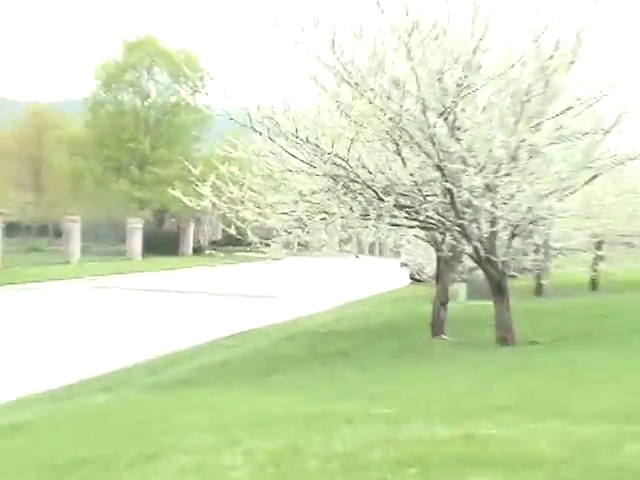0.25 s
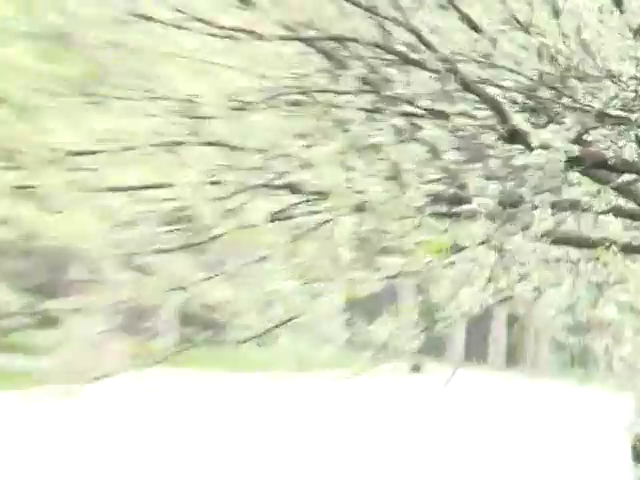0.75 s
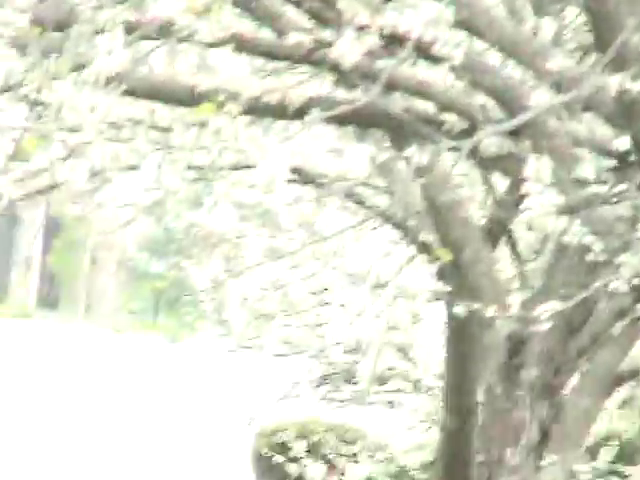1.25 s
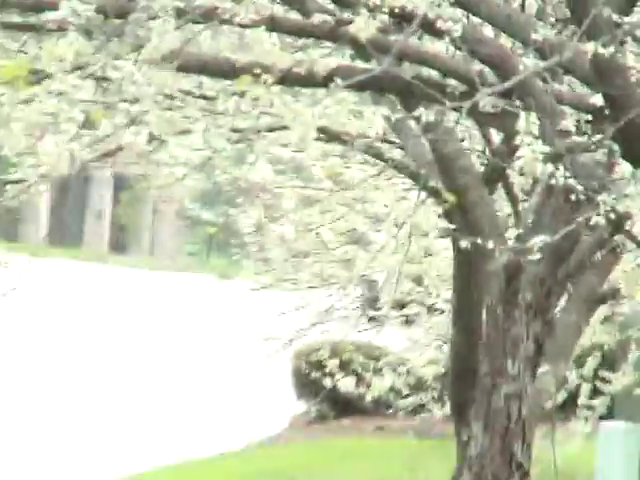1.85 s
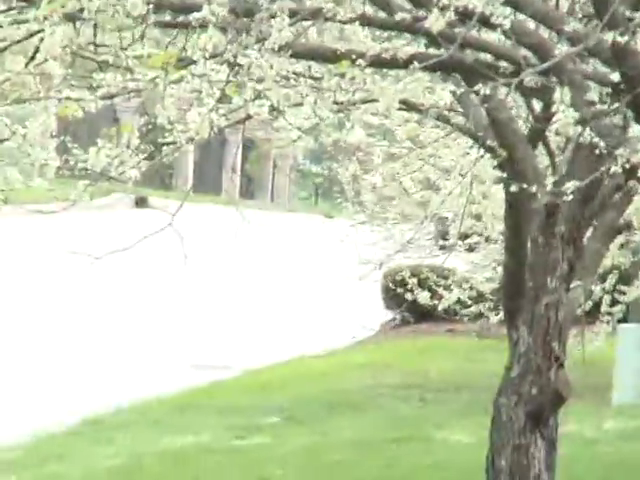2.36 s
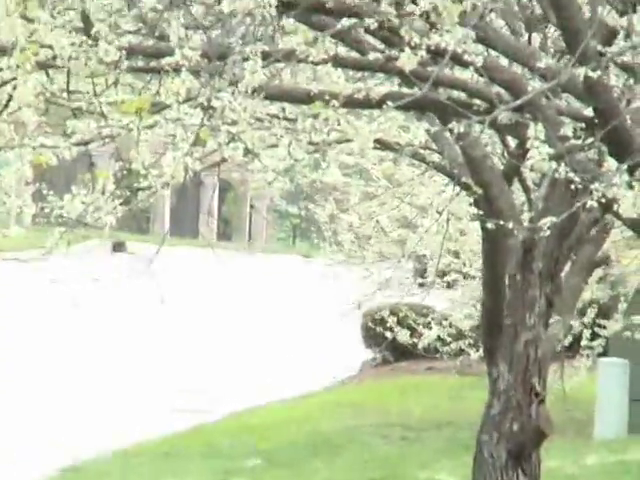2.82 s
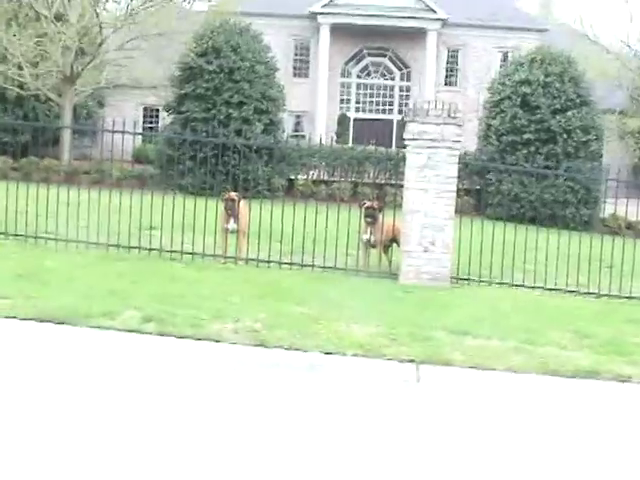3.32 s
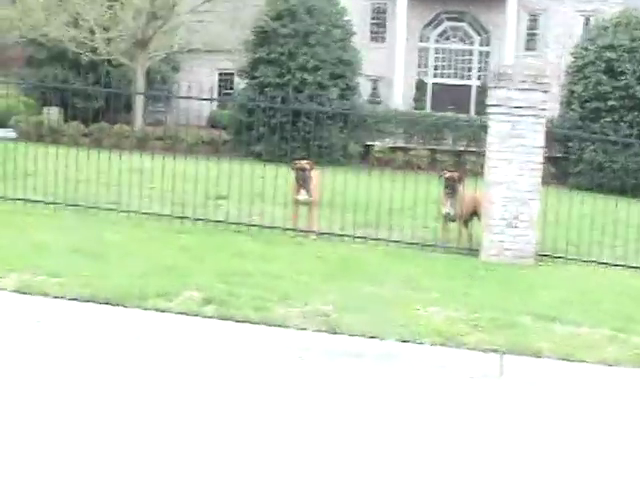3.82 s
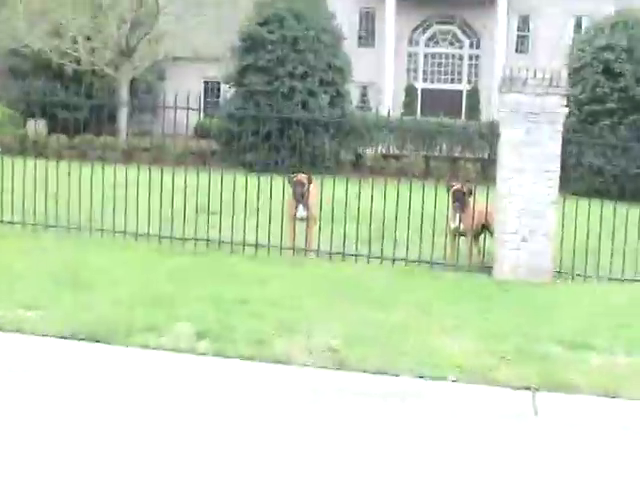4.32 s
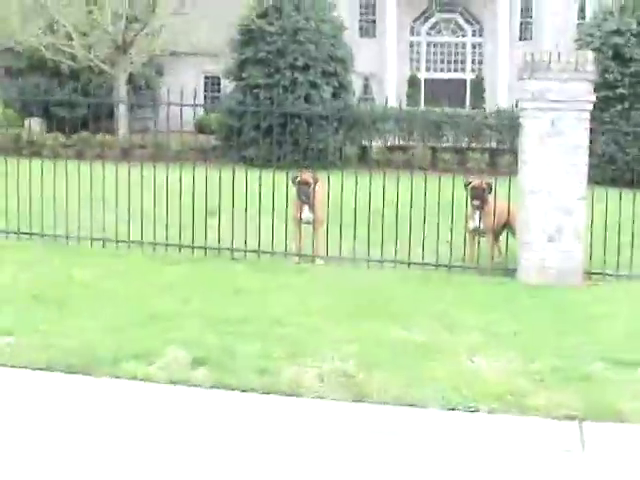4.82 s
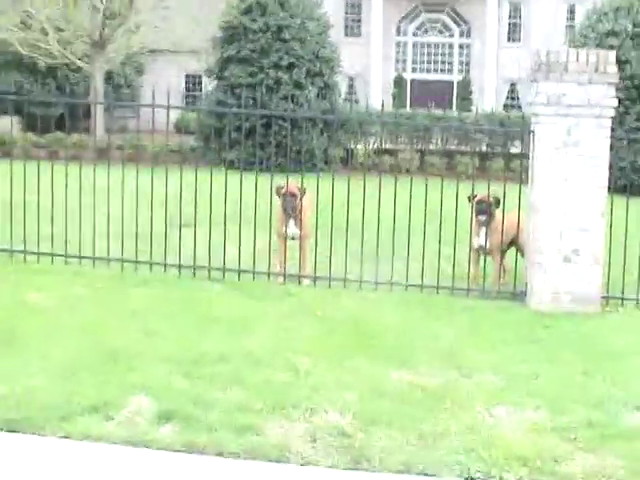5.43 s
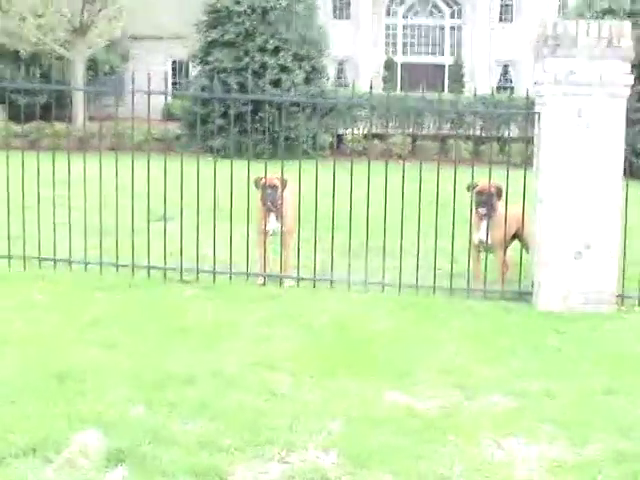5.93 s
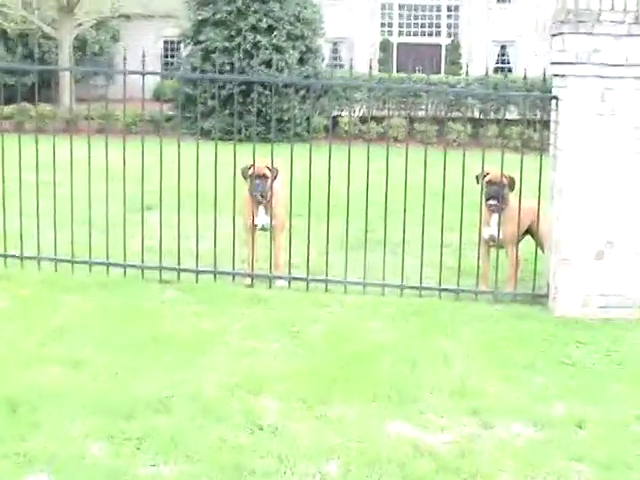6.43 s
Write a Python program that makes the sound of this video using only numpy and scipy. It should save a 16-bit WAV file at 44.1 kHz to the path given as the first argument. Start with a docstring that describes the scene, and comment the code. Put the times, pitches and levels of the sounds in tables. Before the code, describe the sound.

Hollow tyre howl and hiss recede within a second and a half, clicks and chirps follow, then a sudden switch to rapid birdsong, wind puffs and grass shuffles.

```python
"""An electric cart rolls away on a paved drive: noise through groove resonances howls over hiss and rumble.
Under it lie air, a distant drone, a whine and a hum; slurred bird whistles and small hard clicks follow.
Just after 3 s the scene cuts abruptly: drone and whine stop, fuller air begins, and a bird sings two runs
of arched notes, gliding sines echoed by a house front. Wind puffs and grass shuffles are swelling noise;
knocks ring briefly. Throughout, a converter clocked at 16 kHz mirrors the sound into the treble."""
import sys
import numpy as np
from scipy import signal
from scipy.fft import rfft, irfft, next_fast_len
from scipy.io import wavfile
from scipy.ndimage import uniform_filter1d, map_coordinates

SR = 44100
rng = np.random.default_rng(int(sys.argv[2]) if len(sys.argv) > 2 else 0)


def store_wav(level_fs):
    """Save 16-bit WAV to argv[1]."""
    pcm = np.round(np.clip(np.atleast_2d(level_fs), -1, 1) * 32767)
    wavfile.write(sys.argv[1], SR, pcm.T.astype(np.int16))


N = 294235

# Tread groove resonances, lowest, second and upper group: (centre [Hz], width [Hz], relative level [dB])
LOW_GROOVES = [(695, 44, 1), (804, 32, 7.5), (905, 340, -16)]
SECOND_GROOVES = [(1527, 17, -3), (1623, 43, 1), (1750, 136, -6.5), (1880, 80, -30)]
UPPER_GROOVES = [(2115, 230, -6.5), (2444, 120, 1.5), (2540, 64, -1), (2630, 64, -2), (2640, 98, 0)]
# Loudness of each groove group as the cart rolls off: (time [s], level [dB])
LOW_HOWL_LEVEL = [(0.0, -15.5), (0.036, -9.5), (0.132, -15), (0.326, -9.5), (0.42, -13.5), (0.434, -8.5),
                  (0.482, -17.5), (0.53, -12), (0.638, -18), (0.718, -11.5), (0.818, -18), (1.406, -41.5),
                  (1.486, -50.5), (1.7, -50.5)]
SECOND_HOWL_LEVEL = [(0.0, -14.5), (0.236, -17.5), (0.274, -11.5), (0.42, -22.5), (0.43, -17), (0.6, -14),
                     (0.624, -19.5), (0.638, -15.5), (0.89, -31.5), (1.7, -63)]
UPPER_HOWL_LEVEL = [(0.0, -15), (0.008, -14.5), (0.278, -21.5), (0.292, -17), (0.4, -22.5), (0.572, -17.5),
                    (0.618, -30), (0.634, -22.5), (1.5, -63.5)]
# Loudness of the tread hiss, before HISS_DB is added: (time [s], level [dB])
TREAD_HISS_LEVEL = [(0.0, -23.5), (0.066, -21.5), (0.354, -28), (0.568, -25.5), (0.648, -29.5),
                    (0.672, -25), (0.728, -32.5), (1.032, -44), (1.15, -45.5), (1.7, -71.5)]
# Noise colours of tread hiss and body rumble: (frequency [Hz], relative level [dB])
HISS_COLOUR = [(500, -11.5), (1250, -11.5), (3000, -2.5), (3350, 0.5), (3560, 4.5), (3750, -1.5),
               (4200, -2), (4800, -6), (5600, -6), (6700, -10.5), (8000, -21.5), (10000, -53)]
RUMBLE_COLOUR = [(25, -28), (60, -4.5), (120, -0.5), (240, -6.5), (400, -9), (600, -12), (1200, -31.5)]
# Left-right likeness of the tyre noise: (frequency [Hz], likeness [0-1])
CART_ALIKE = [(200, 0.64), (700, 0.77), (1500, 1), (2500, 0.82), (4500, 0.72), (7000, 0.47)]
# Phase by which the left channel leads the right: (frequency [Hz], lead [rad])
CART_LEAD = [(0, 0), (520, 0.64), (2670, 0.36), (6290, 0.22), (7670, 0.39), (12400, -0.3), (13400, -0.19),
             (15200, -0.5)]
HISS_DB = 2.5  # tread hiss above its level table
BODY_DB, BODY_SAG_DB_PER_S = -36.5, 4  # body rumble and its slow decline
BODY_GONE_S, BODY_FADE_DB_PER_S = 1.19, 35  # from here the rumble drops away faster

# Noise colours of open air and distant drone: (frequency [Hz], relative level [dB])
AIR_COLOUR = [(25, -6), (60, -2), (115, 0), (170, -9), (280, -5.5), (420, -7.5), (650, -4.5), (1000, -9),
              (1700, -14), (2500, -5), (3600, -19), (5850, -16.5), (8000, -22), (10400, -32)]
DRONE_COLOUR = [(25, -20), (65, -2.5), (120, 1.5), (160, -10.5), (320, -2.5), (400, -8.5), (470, -14),
                (620, -10), (800, -10), (1000, -15), (1900, -15.5), (5000, -20), (7500, -21.5),
                (10400, -49)]
# Left-right likeness of rumble, air, drone and grass: (frequency [Hz], likeness [0-1])
OPEN_ALIKE = [(50, 0.18), (130, 0.28), (300, 0.75), (1400, 0.83), (3000, 0.64), (7000, 0.22)]
CUT_S, CUT_FADE_S = 3.06, 0.023  # centre and length of the abrupt cut
AIR_DB, AIR_BEFORE_DB = -49.5, -14  # air after the cut; how much lower it lies before
DRONE_DB, FLOOR_GRAIN_DB = -48.5, 0.7  # drone rms level; grain depth of air and drone
WHINE_DB, HUM_PEAK_DB = -63.5, -70  # settled whine, rms; hum, peak
WHINE_EXTRA_DB, WHINE_EASE_S, WHINE_SETTLED_S = 13.5, 1.05, 1.62  # stronger at first, eases, settles

# Other birds' whistles: (start [s], length [s], start, middle and end pitch [Hz], level [dB])
WHISTLES = [(1.153, 0.013, 6500, 7360, 8300, -32), (1.453, 0.025, 6360, 6320, 6600, -48.5),
            (1.979, 0.051, 4400, 3930, 3930, -61), (2.14, 0.18, 3790, 3790, 4640, -63),
            (2.362, 0.16, 3330, 3060, 2800, -59), (2.461, 0.035, 6700, 6550, 6260, -49.5),
            (2.468, 0.17, 2635, 2180, 1950, -50.5), (2.528, 0.043, 6500, 6600, 6550, -57.5),
            (2.561, 0.05, 4400, 4100, 3970, -55.5), (2.575, 0.2, 2080, 1836, 1730, -55.5),
            (2.751, 0.0094, 5960, 7150, 7950, -52), (2.812, .08, 6350, 5360, 4900, -54.5),
            (2.909, 0.096, 3500, 3070, 2810, -48), (3.67, 0.026, 4650, 4970, 5070, -49.5),
            (4.205, 0.019, 4650, 5030, 5200, -47.5), (5.779, 0.047, 7000, 6860, 6800, -49.5),
            (5.892, 0.037, 7330, 7530, 7540, -51)]
# Small hard clicks: (time [s], peak [dB])
CLICKS = [(1.301, -20), (1.602, -33), (1.84, -28.5), (2.124, -36)]
# Ringing modes of the clicking part: (frequency [Hz], relative level [dB], t60 [s])
CLICK_MODES = [(660, 2, 0.029), (1140, -4, 0.022), (1900, 3, 0.026), (2500, -28, 0.0183), (3830, -16, .015)]

# Arched notes before a run reshapes them: (time from crest [s], pitch [Hz], relative level [dB])
FIRST_NOTE = [(-.048, 2151, -25), (-.026, 2192, -10.5), (-.015, 2652, -10.5), (-.006, 3032, -11.5),
              (.004, 2979, -9), (.013, 2740, -1.5), (.022, 2470, -2.5), (.030, 2220, -8.5),
              (.035, 2000, -35)]
SECOND_NOTE = [(-.055, 1793, -16), (-.038, 1774, -10), (-.027, 2023, -1), (-.016, 2677, -12),
               (0, 2795, -13), (.012, 2720, -4), (.021, 2275, -1), (.029, 2073, -9), (.037, 2000, -20)]
# Notes of each run: (crest time [s], level added to the note shape [dB], pitch ratio, length ratio)
FIRST_RUN = [(3.075, -31, 1.047, 0.61), (3.219, -33.5, 1.02, 1.06), (3.413, -32, 1.03, 0.78),
             (3.6, -34, 0.99, 0.79), (3.785, -33.5, 0.97, 0.87), (3.958, -34, 1.035, 0.86),
             (4.102, -33, 1.034, 0.81), (4.253, -32.5, 1.03, 0.96), (4.421, -30.5, 1.02, 0.79),
             (4.588, -30.5, 1.01, 0.83), (4.779, -31.5, 1.01, 0.81), (4.964, -34, 1.01, 0.91),
             (5.147, -36, 0.94, 1.29)]
SECOND_RUN = [(5.279, -36, 0.99, 0.82), (5.393, -36.5, 0.97, 0.93), (5.503, -35.5, 1.01, 1),
              (5.622, -36, 1, 0.96), (5.746, -40.5, 1.01, 1.2), (5.893, -36, 0.95, 0.79),
              (6.019, -38, .94, 1), (6.147, -35.5, 0.93, 1.02), (6.285, -36.5, 0.96, 1.17),
              (6.424, -39, 0.99, 1.13)]
# House front echoes of each run: (delay [s], level [dB])
FIRST_RUN_ECHOES = [(.058, -9), (.108, -15.5)]
SECOND_RUN_ECHOES = [(.058, -16.5)]
# Ground and gatepost reflections: (delay [s], level [dB])
NEAR_REFLECTIONS = [(.0031, -18), (.0056, -11), (.0095, -14), (.021, -22.5)]
# Decay of the garden scatter: (frequency [Hz], t60 [s])
GARDEN_DECAY = [(200, 0.22), (2500, 0.59), (8000, 0.85)]

# Noise colour of wind on the microphone: (frequency [Hz], relative level [dB])
WIND_COLOUR = [(20, -12), (60, -2), (110, 1), (160, -1), (260, -8), (500, -14.5), (1200, -47)]
# Left-right likeness of the wind: (frequency [Hz], likeness [0-1])
WIND_ALIKE = [(60, 0.68), (380, 0.7), (2380, 1), (15000, 0.41)]
# Puffs of wind: (start [s], hold [s], level before the low-pass [dB], low-pass corner [Hz])
PUFFS = [(3.19, .02, -60, 600), (3.34, 0.018, -68, 600), (3.65, 0.016, -41, 400), (3.81, .16, -42.5, 505),
         (4.224, 0.23, -41.5, 500), (4.83, .16, -49.5, 500), (5.441, .02, -47.5, 200),
         (5.913, 0.022, -42.5, 150), (6.477, 0.044, -40, 100), (6.6, 0.028, -47.5, 102)]
PUFF_ATTACK_S, PUFF_RELEASE_S, DRAUGHT_DB = 0.021, 0.048, -60  # time constants; wind between puffs
# Noise colour of rustling grass: (frequency [Hz], relative level [dB])
GRASS_COLOUR = [(200, -2), (700, -0.5), (1700, 2), (3300, -5), (5000, -7), (6500, -7.5), (8000, -13),
                (10000, -22)]
# Shuffles in the grass: (start [s], hold [s], level [dB])
SHUFFLES = [(3.53, 0.018, -58), (3.6, 0.084, -55), (3.785, 0.013, -44.5), (3.93, 0.021, -49.5),
            (4.12, 0.03, -59), (4.21, 0.03, -49), (4.61, .04, -58), (4.75, 0.032, -48), (5.22, 0.11, -55),
            (5.84, 0.023, -44.5), (6.19, 0.048, -44), (6.31, .05, -47.5)]
SHUFFLE_ATTACK_S, SHUFFLE_RELEASE_S, STIR_DB = 0.011, 0.024, -57  # time constants; faint stirring
# Knocks of hand and foot: (time [s], peak [dB], resonance [Hz], t60 of the scrape [s])
KNOCKS = [(3.593, -22.5, 382, 0.016), (3.597, -22.5, 700, 0.022), (4.094, -36, 660, 0.059),
          (4.23, -32, 4500, 0.0069), (4.652, -34, 500, 0.055), (4.988, -37, 640, 0.028),
          (5.368, -27.5, 1040, 0.0097), (5.505, -33.5, 660, 0.095), (5.551, -38, 703, 0.013),
          (5.795, -34.5, 1100, 0.027), (5.879, -22.5, 800, 0.014), (5.88, -25.5, 2470, .008),
          (6.166, -24.5, 685, 0.15), (6.192, -27, 740, 0.075), (6.216, -28, 750, 0.061),
          (6.371, -33.5, 3600, 0.013)]

# Level of the converter's mirror image: (image frequency [Hz], level [dB])
MIRROR_LEVEL = [(8000, -11), (8800, -9), (9500, -11), (11000, -15), (12500, -16.5), (13500, -21.5),
                (14400, -24), (15200, -30.5)]
CLOCK_HZ, TOP_HZ = 16000, 15600  # converter clock; upper edge of the output


def amp(db):
    """Decibels to gain."""
    return 10 ** (np.asarray(db) / 20)


def unit(x):
    """Scale to rms 1."""
    return x / np.sqrt(np.mean(x ** 2) + 1e-20)


def along(points, hz):
    """Read (Hz, value) points on a log frequency axis."""
    f, v = np.transpose(points)
    return np.interp(np.log(hz + 1), np.log(f), v)


def shape(points):
    """Turn (Hz, dB) points into a frequency response."""
    return lambda f: amp(along(points, f))


def gains(rows):
    """One gain per sample from (s, dB) rows; it dies away after the last row."""
    s, db = np.transpose(rows)
    return amp(np.interp(np.arange(N) / SR, np.r_[s, s[-1] + 2], np.r_[db, -100]))


def wobble(rate, size=N):
    """A smooth random curve with rate knots a second."""
    knots = rng.standard_normal(int(size * rate / SR) + 4)
    return map_coordinates(knots, [np.arange(size) * rate / SR])


def filtered(x, response):
    """Shape the spectrum of x by a response, with zero padding for the ring-out."""
    size = x.shape[-1]
    padded = next_fast_len(size + SR // 4)
    spectrum = rfft(x, padded) * response(np.fft.rfftfreq(padded, 1 / SR))
    return irfft(spectrum, padded)[..., :size]


def resonance(f, hz, width):
    """Response of one damped mode."""
    return 1j * f * width / (hz * hz - f * f + 1j * f * width)


def rush(colour, alike, grain_db=0, grain_rate=200):
    """Coloured stereo noise of rms 1, clumped into grains; mid-side balance sets the likeness."""
    source = rng.standard_normal((2, N)) * amp(grain_db * wobble(grain_rate))

    def mid_side(f):
        angle = np.arccos(np.clip(along(alike, f), 0, .999)) / 2
        return colour(f) * np.array([np.cos(angle), np.sin(angle)])

    mid, side = filtered(source, mid_side)
    return unit(np.array([mid + side, mid - side]))


def patchy(x, depth_db):
    """Let the colour of a noise wander: patches of random gain in time and frequency."""
    z = signal.stft(x, nperseg=512)[2]
    field = rng.standard_normal(z.shape[1:])
    field = uniform_filter1d(field, size=5, axis=0)  # smooth across frequency
    field = uniform_filter1d(field, size=16, axis=1)  # smooth across time
    return unit(signal.istft(z * amp(depth_db * unit(field)), nperseg=512)[1][:, :N])


def pan(x, right_db):
    """Lean a sound to the right, or to the left if negative."""
    return x * amp([[-right_db / 2], [right_db / 2]])


def lead(x, points):
    """Let the left channel lead the right one in phase."""
    return filtered(x, lambda f: np.exp(.5j * np.outer([1, -1], along(points, f))))


def add(track, s, sound):
    """Mix a sound in at time s."""
    part = track[max(round(s * SR), 0):][:len(sound)]
    part += sound[:len(part)]


def swells(rows, attack, release):
    """Gain of events that rise, hold and die away exponentially; the strongest one wins."""
    t = np.arange(N) / SR
    events = []
    for s, hold, db in rows:
        rise = np.minimum(t - s, 0) / attack
        fall = np.maximum(t - s - hold, 0) / release
        events.append(amp(db) * np.exp(rise - fall))
    return np.max(events, axis=0)


def pipe(modes, low_hz, high_hz, steadiness):
    """Tread blocks pump air through groove resonances; many at once even out the loudness."""
    def ring(f):
        return np.sqrt(sum(np.abs(amp(db) * resonance(f, hz, width)) ** 2 for hz, width, db in modes))

    def skirts(f):
        return (1 - 1 / (1 + (f / low_hz) ** 10)) / (1 + (f / high_hz) ** 10)

    howl = rush(lambda f: ring(f) * skirts(f), CART_ALIKE, grain_db=-0.5, grain_rate=230)
    power = np.abs(uniform_filter1d(np.mean(howl ** 2, axis=0), size=2600))
    return unit(howl / power ** (np.clip(steadiness, 0, 1) / 2))


def cart():
    """Groove howl, tread hiss and body rumble; the treble fades first as the cart draws off."""
    t = np.arange(N) / SR
    low = pipe(LOW_GROOVES, low_hz=630, high_hz=1144, steadiness=0.59)
    second = pipe(SECOND_GROOVES, low_hz=1500, high_hz=1930, steadiness=0.39)
    tyres = gains(LOW_HOWL_LEVEL) * low + gains(SECOND_HOWL_LEVEL) * second
    upper = pipe(UPPER_GROOVES, low_hz=1910, high_hz=2840, steadiness=0.42)
    hiss = patchy(rush(shape(HISS_COLOUR), CART_ALIKE, grain_db=1, grain_rate=180), depth_db=1.87)
    bright = gains(UPPER_HOWL_LEVEL) * upper + gains(TREAD_HISS_LEVEL) * amp(HISS_DB) * hiss
    body_db = BODY_DB - BODY_SAG_DB_PER_S * t - BODY_FADE_DB_PER_S * np.maximum(t - BODY_GONE_S, 0)
    rumble = amp(body_db) * rush(shape(RUMBLE_COLOUR), OPEN_ALIKE, grain_db=1.5, grain_rate=20.2)
    return lead(tyres + pan(bright, right_db=1.2), CART_LEAD) + pan(rumble, right_db=7.0)


def after_cut():
    """Rises from 0 to 1 at the cut."""
    return np.clip((np.arange(N) / SR - CUT_S) / CUT_FADE_S + .5, 0, 1)


def open_air():
    """Soft broadband air with a wandering colour, fuller after the cut."""
    noise = rush(shape(AIR_COLOUR), OPEN_ALIKE, grain_db=FLOOR_GRAIN_DB, grain_rate=22)
    return amp(AIR_DB + AIR_BEFORE_DB * (1 - after_cut())) * patchy(noise, depth_db=1.5)


def distant_drone():
    """Low, patchy noise that stops at the cut."""
    noise = rush(shape(DRONE_COLOUR), OPEN_ALIKE, grain_db=FLOOR_GRAIN_DB, grain_rate=15)
    return (1 - after_cut()) * amp(DRONE_DB) * patchy(noise, depth_db=2.1)


def whine():
    """A thin sine with a restless phase, stronger at first, that stops with the drone."""
    t = np.arange(N) / SR
    db = WHINE_DB + np.interp(t, [WHINE_EASE_S, WHINE_SETTLED_S], [WHINE_EXTRA_DB, 0])
    tone = np.sqrt(2) * np.sin(2 * np.pi * 5657 * t + 0.6 * wobble(47))
    return (1 - after_cut()) * amp(db) * tone


def hum():
    """A low sine whose phase drifts slowly."""
    t = np.arange(N) / SR
    return amp(HUM_PEAK_DB) * np.sin(2 * np.pi * 119 * t + 0.44 * wobble(5.0))


def chirp(hz, level, rough, flutter_db, halves_db):
    """Unsteady whistle; unlike alternate cycles add faint lines half a pitch below and above."""
    phase = 2 * np.pi * np.cumsum(hz * (1 + rough * wobble(502.6, len(hz)))) / SR
    flutter = amp(flutter_db * wobble(212.0, len(hz)))
    alternation = 1 + amp(halves_db) * np.sin(phase / 2)
    return np.sqrt(2) * level * flutter * np.sin(phase) * alternation


def whistles(rows):
    """Single slurred bird calls that swell and fade."""
    track = np.zeros(N)
    for s, length, start, middle, end, db in rows:
        u = np.linspace(0, 1, int(length * SR))
        glide = np.polyval(np.polyfit([0, .5, 1], [start, middle, end], 2), u)
        level = amp(db) * np.sin(np.pi * u)
        add(track, s, chirp(glide, level, rough=0.014, flutter_db=3.5, halves_db=-40))
    return track


def clicks():
    """A small hard part snaps and rings briefly in its own modes."""
    track, t = np.zeros(N), np.arange(SR // 10) / SR
    ring = sum(amp(db - 60 * t / t60) * np.sin(2 * np.pi * hz * t) for hz, db, t60 in CLICK_MODES)
    for s, db in CLICKS:
        burst = rng.standard_normal(len(t)) * amp(-60 * t / 0.0096)
        snap = filtered(burst, lambda f: 1 / (1 + (f / 4200) ** 6))
        click = ring + 2.3 * snap
        add(track, s, amp(db) * click / np.abs(click).max())
    return track


def song(note, run):
    """One arched note repeated, each time a little different in pitch, length, bend and stress."""
    track = np.zeros(N)
    s, hz, db = np.transpose(note)
    for crest, peak_db, pitch, length in run:
        t = np.arange(s[0] * length, s[-1] * length, 1 / SR)
        arch = uniform_filter1d(np.interp(t / length, s, hz), size=200)
        glide = arch * (1 + 0.012 * wobble(61, len(t)))
        level = amp(peak_db + np.interp(t / length, s, db) + 2.2 * wobble(72, len(t)))
        add(track, crest + t[0], chirp(pitch * glide, level, rough=0.023, flutter_db=1.5, halves_db=-17.5))
    return track


def singer():
    """Both runs with their house front echoes; the song comes in mid-note."""
    sung = echoes(song(FIRST_NOTE, FIRST_RUN), FIRST_RUN_ECHOES)
    sung += echoes(song(SECOND_NOTE, SECOND_RUN), SECOND_RUN_ECHOES)
    return sung * np.interp(np.arange(N) / SR, [3.075, 3.079], [.15, 1])


def echoes(x, paths):
    """Reflecting surfaces add delayed, weaker copies of a sound."""
    return filtered(x, lambda f: 1 + sum(amp(db) * np.exp(-2j * np.pi * f * delay) for delay, db in paths))


def garden(x, wet_db):
    """Diffuse scatter from trees and walls: a decaying noise tail, different in each channel."""
    hz, t, z = signal.stft(rng.standard_normal((2, SR // 2)), SR, nperseg=256)
    decay = amp(-60 * t / along(GARDEN_DECAY, hz)[:, None])
    tail = signal.istft(z * decay, SR, nperseg=256)[1]
    scatter = signal.fftconvolve(x[None], tail / np.linalg.norm(tail[0]), axes=1)[:, :N]
    return x + amp(wet_db) * scatter


def wind():
    """Puffs, some deep and some brighter, buffet the microphone over a light, uneven draught."""
    buffet = rush(shape(WIND_COLOUR), WIND_ALIKE, grain_db=1.7, grain_rate=26)
    sound = after_cut() * amp(DRAUGHT_DB + 3.1 * wobble(8)) * buffet
    for s, hold, db, top_hz in PUFFS:
        puff = swells([(s, hold, db)], PUFF_ATTACK_S, PUFF_RELEASE_S) * buffet
        sound += filtered(puff, lambda f: 1 / (1 + (f / top_hz) ** 4))
    return sound


def grass():
    """Feet shuffle on the lawn; the blades keep stirring faintly in between."""
    stirring = after_cut() * amp(STIR_DB + 1.3 * wobble(14))
    strength = swells(SHUFFLES, SHUFFLE_ATTACK_S, SHUFFLE_RELEASE_S) + stirring
    return strength * rush(shape(GRASS_COLOUR), OPEN_ALIKE, grain_db=3, grain_rate=450)


def taps(rows, breadth, brightness, push):
    """Each contact is a push and a dying scrape through one broad resonance; low knocks are dull."""
    track, t = np.zeros(N), np.arange(SR // 6) / SR
    for s, db, hz, t60 in rows:
        scrape = rng.standard_normal(len(t)) * amp(-60 * t / t60)
        burst = scrape + push * signal.unit_impulse(len(t), 32)
        top_hz = min(brightness * hz, 6000)

        def body(f):
            tilt = f / (f + hz / 2) / (1 + (f / top_hz) ** 4)
            return resonance(f, hz, breadth * hz) * tilt

        knock = filtered(burst, body)
        add(track, s, amp(db) * knock / np.abs(knock).max())
    return track


def scene():
    """Cart and background, then birds, wind, grass and small knocks in the open garden."""
    background = pan(open_air() + distant_drone() + whine() + hum(), right_db=3.0)
    birds = garden(whistles(WHISTLES), wet_db=-3.5)
    birds += garden(echoes(singer(), NEAR_REFLECTIONS), wet_db=-9.5)
    contacts = clicks() + taps(KNOCKS, breadth=0.35, brightness=3.4, push=3.9)
    knocks = garden(contacts, wet_db=-23)
    wind_and_grass = pan(wind(), right_db=6.5) + pan(grass(), right_db=-1.5)
    return cart() + background + pan(birds, right_db=1) + wind_and_grass + pan(knocks, right_db=1.5)


def record(dry):
    """The converter mirrors the sound about half its clock rate; peaks past full scale clip."""
    clock = 2 * np.cos(2 * np.pi * CLOCK_HZ * np.arange(N) / SR)
    image = filtered(dry * clock, lambda f: shape(MIRROR_LEVEL)(f) * (f > CLOCK_HZ / 2))
    return filtered(np.clip(dry + image, -1, 1), lambda f: f < TOP_HZ)


dry = scene()
out = record(dry)
store_wav(out)
```